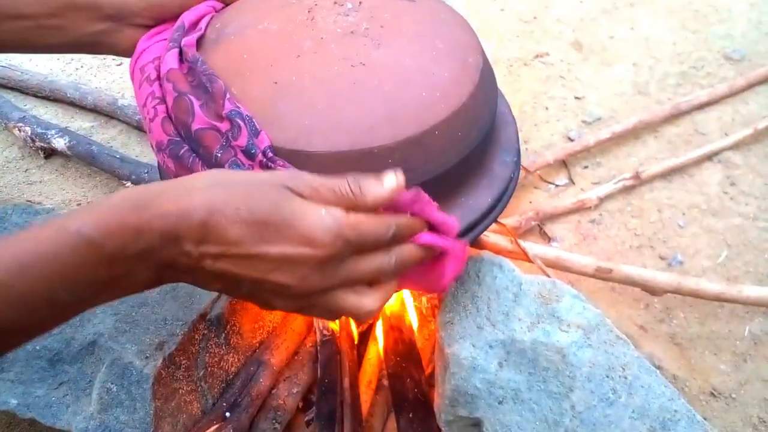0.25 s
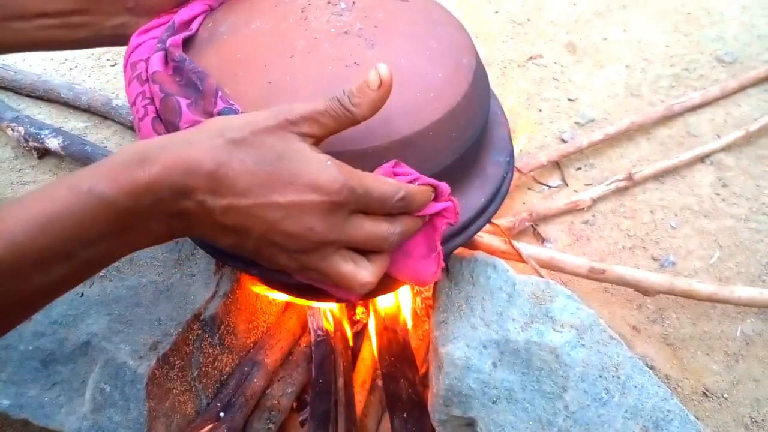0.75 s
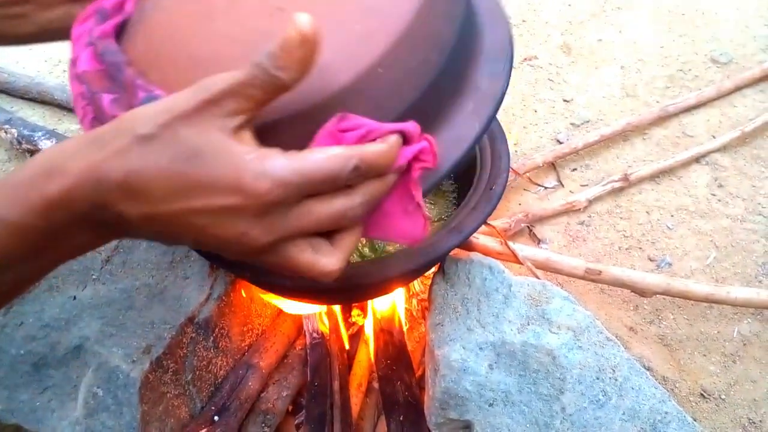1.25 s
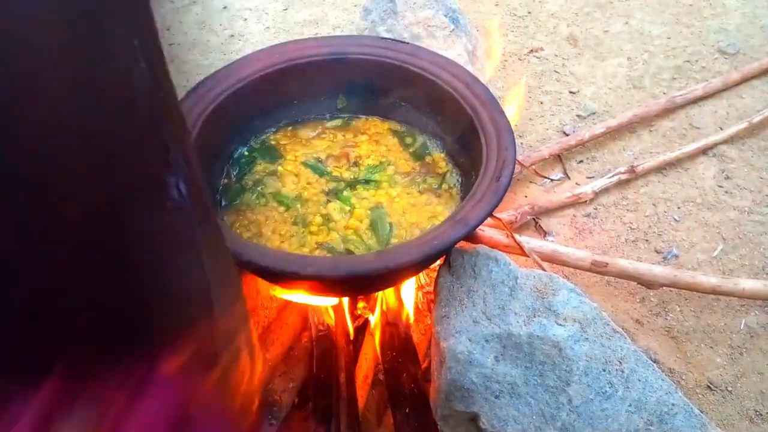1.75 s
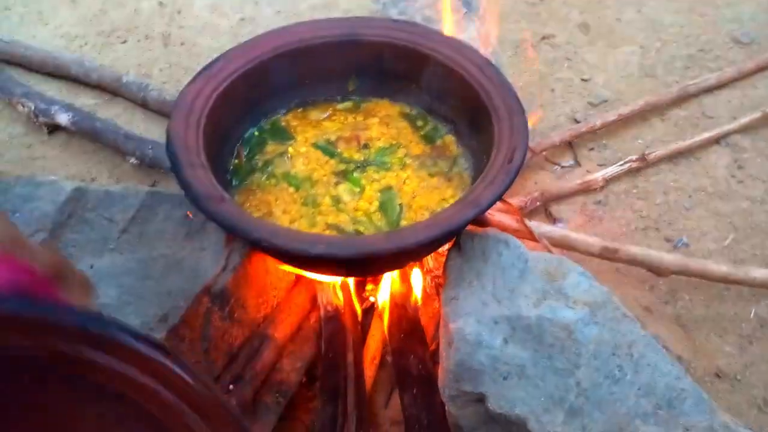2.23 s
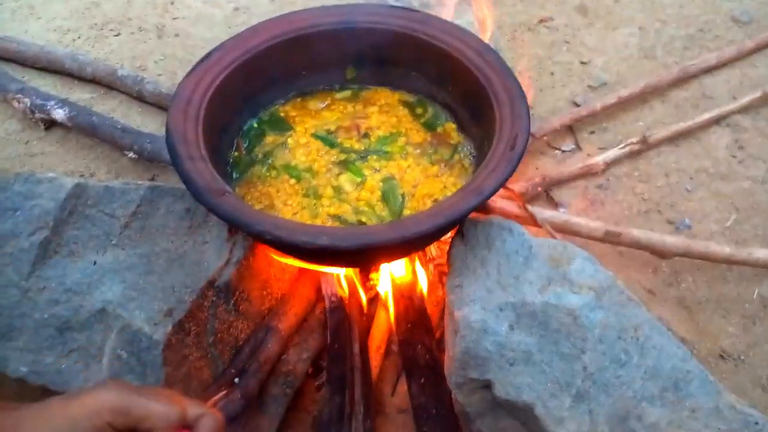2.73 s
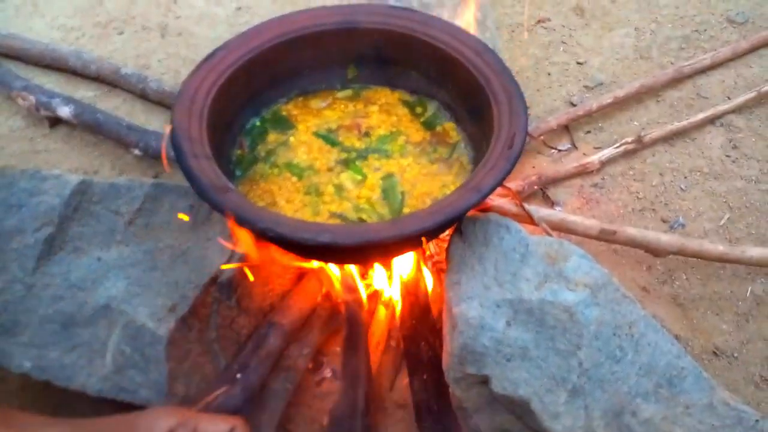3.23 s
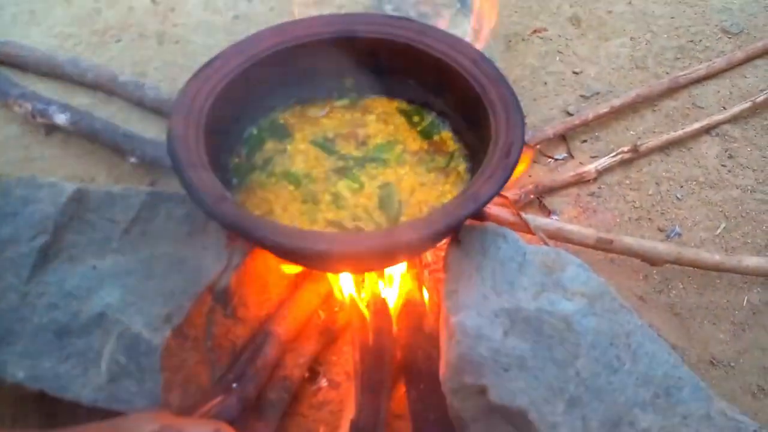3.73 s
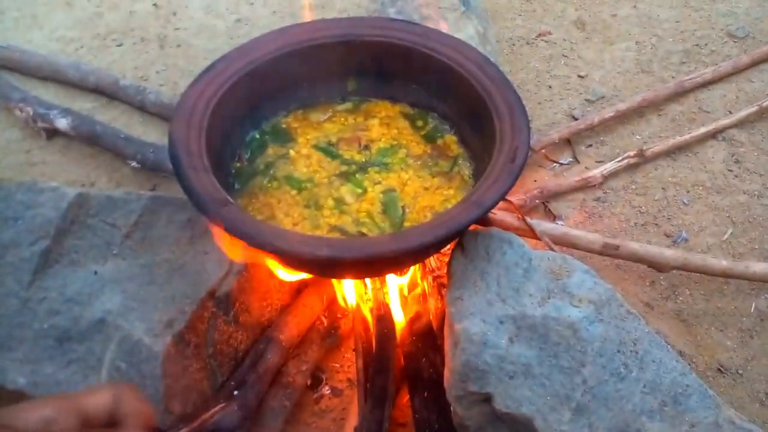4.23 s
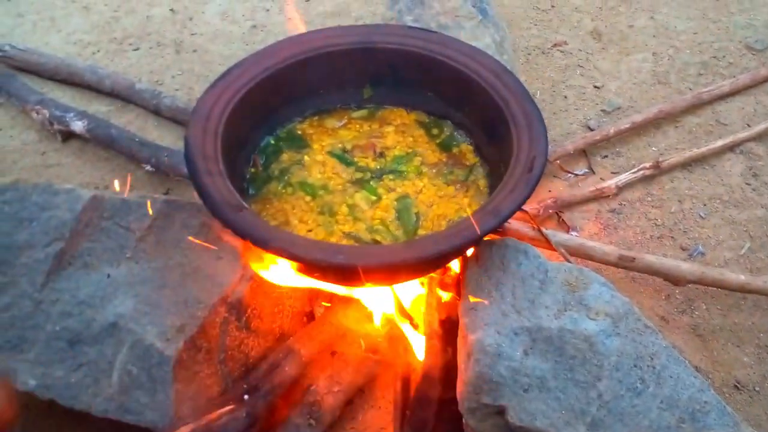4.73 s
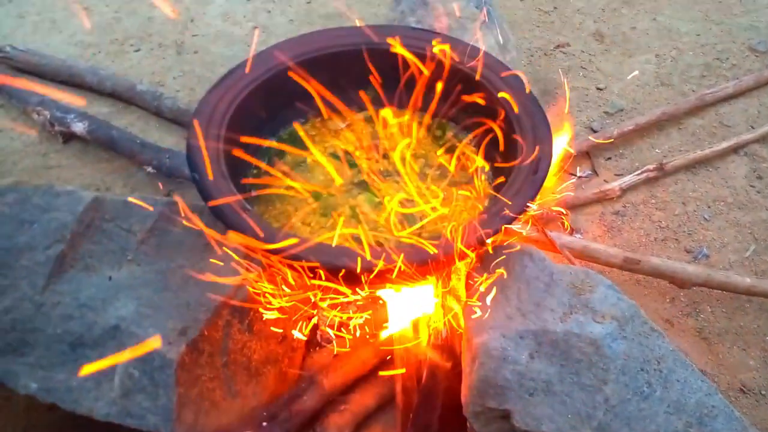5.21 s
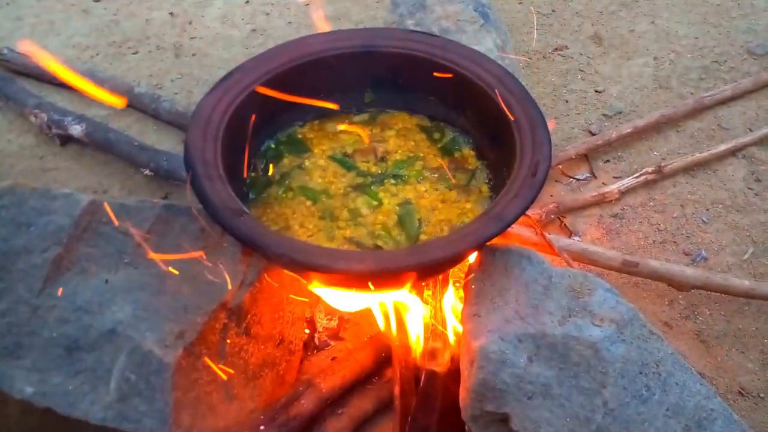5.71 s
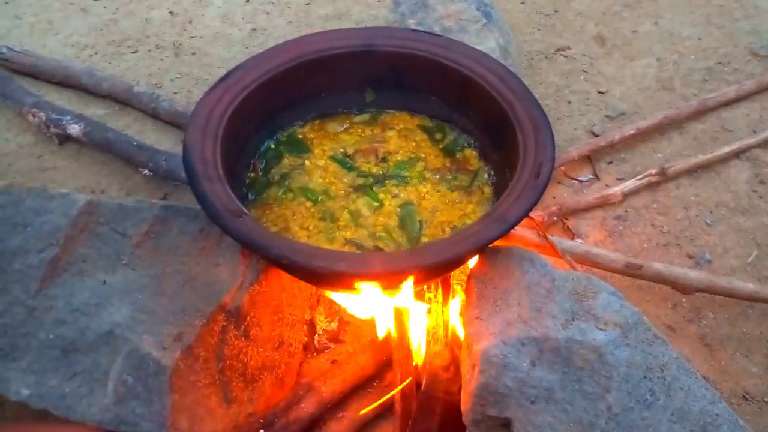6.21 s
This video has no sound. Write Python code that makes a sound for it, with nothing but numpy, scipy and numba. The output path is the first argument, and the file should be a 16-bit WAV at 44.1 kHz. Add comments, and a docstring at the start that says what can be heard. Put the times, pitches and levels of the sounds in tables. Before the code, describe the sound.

Outdoors, insects buzz steadily as a pot simmers over popping embers and a clay lid slides off, drags and knocks once sharply.

```python
"""Outdoors, close to a pot simmering on a wood fire. From the start flames rumble and embers crack; a far
chorus of insects drones, with a nearer buzz high above it. In the first second and a half the clay lid slides
off, shaking the air under it; then the open pot bubbles and spits, and one nearer singer swells. The lid is
dragged and knocked on gritty ground, which rings the clay, loudest just before 5 s. After two last light knocks
near 5.6 s, the end is left to the pot, the fire and the insects."""
import sys
import numpy as np
from scipy import signal
from scipy.fft import rfft, irfft
from scipy.io import wavfile
from numba import njit

SR = 44100
rng = np.random.default_rng(int(sys.argv[2]) if len(sys.argv) > 2 else 0)


def wav_out(sig):
    """Save sig, one row per channel (or a flat mono array), as 16-bit PCM at SR to the path in sys.argv[1]."""
    wavfile.write(sys.argv[1], SR, np.round(np.clip(np.atleast_2d(sig).T, -1, 1) * 32767).astype(np.int16))


N = 284886
TIME = np.arange(N) / SR


def from_db(db):
    return 10 ** (np.asarray(db) / 20)


def rms_one(x):
    return x / np.sqrt(np.mean(x ** 2) + 1e-20)


def in_time(rows):
    """One curve per column, joining the rows (time, values...) by straight lines."""
    times, *columns = np.transpose(rows)
    return [np.interp(TIME, times, column) for column in columns]


def ramp(start_s, length_s):
    """Climbs from 0 to 1, then holds."""
    return np.clip((TIME - start_s) / length_s, 0, 1)


def drift(rate):
    """Slow random wander of spread 1, about rate turns a second."""
    r = np.exp(-80 * np.pi * rate / SR)
    slow = signal.lfilter([1], [1, -2 * r, r * r], rng.standard_normal(N // 40 + 2002))[2000:]
    return np.interp(np.arange(N) / 40, np.arange(len(slow)), rms_one(slow))


def colour(x, spectrum):
    """Filter x by the curve (frequency [Hz], gain [dB]); rms 1."""
    hz, db = np.transpose(spectrum)
    log_hz = np.log(np.fft.rfftfreq(N, 1 / SR) + 1)
    gain = from_db(np.interp(log_hz, np.log(hz), db))
    return rms_one(irfft(rfft(x) * gain, N))


def band(x, low_hz, high_hz):
    sos = signal.butter(2, [low_hz, min(high_hz, .45 * SR)], "band", fs=SR, output="sos")
    return signal.sosfilt(sos, x)


def resonance(x, hz, width_hz):
    r = np.exp(-np.pi * width_hz / SR)
    poles = [1, -2 * r * np.cos(2 * np.pi * hz / SR), r * r]
    return signal.lfilter([(1 - r * r) / 2, 0, (r * r - 1) / 2], poles, x)


@njit
def moving_resonance(x, hz, width_hz):
    r = np.exp(-np.pi * width_hz / SR)
    y = np.zeros(len(x))
    for i in range(2, len(x)):
        y[i] = x[i] - x[i - 2] + 2 * r * np.cos(2 * np.pi * hz[i] / SR) * y[i - 1] - r * r * y[i - 2]
    return y


def ring(x, hz, t60):
    """A unit click sets a sine of height 1 ringing."""
    r, w = from_db(-60 / (t60 * SR)), 2 * np.pi * hz / SR
    return signal.lfilter([0, np.sin(w)], [1, -2 * r * np.cos(w), r * r], x + 1e-18)


def grains(per_s, spread_db):
    """Random clicks, a few much bigger than the rest."""
    sizes = from_db(spread_db * np.minimum(rng.exponential(1, N), 5)) * rng.choice([-1, 1], N)
    return sizes * (rng.random(N) < per_s / SR)


def add(out, start_s, sound, peak_db):
    """Lay a short sound into out at its peak level."""
    i = round(start_s * SR)
    out[i:i + len(sound)] += (from_db(peak_db) * sound / np.abs(sound).max())[:N - i]


# Spectrum of the open air: (frequency [Hz], gain [dB])
AIR_SPECTRUM = [(88, -60), (150, -8), (376, -1.5), (601, -7), (2100, -4.5), (3550, -28.5), (5790, -6),
                (6770, -7.5), (8070, -44), (10000, -10.5), (16000, -65)]
def open_air():
    """The steady noise of the place, behind everything else."""
    return from_db(-65) * colour(rng.standard_normal(N), AIR_SPECTRUM)


def faint_band():
    """Faint narrow noise near 3 kHz that fades as the pot comes open."""
    level_db = -79 - 58 * ramp(1.5, 1)
    narrow = resonance(resonance(rng.standard_normal(N), 2970, 55), 3000, 140)
    return from_db(level_db) * rms_one(narrow)


# Loudness of the distant insects: (time [s], level [dB])
CHORUS_LEVEL = [(0, -62), (1.5, -60.5), (3.3, -59.5), (6.46, -61)]
# Bands they sing in: (centre [Hz], width [Hz], relative level [dB])
INSECT_BANDS = [(5090, 300, -7), (5506, 230, 0), (5886, 37, 0.5), (6224, 520, 1), (6650, 17, -7),
                (6785, 330, -2)]
def far_chorus():
    """Many far singers blur into noisy bands that throb faintly."""
    level_db, = in_time(CHORUS_LEVEL)
    throb_hz, out = 64, 0
    for hz, width_hz, db in INSECT_BANDS:
        throb = 1 + 0.2 * np.sin(2 * np.pi * throb_hz * TIME + 2.7 * drift(1.1))
        noise = resonance(resonance(rng.standard_normal(N), hz, width_hz), hz, 1.84 * width_hz)
        out += from_db(db + 0.79 * drift(6.2)) * throb * noise / np.sqrt(width_hz)
    return from_db(level_db) * rms_one(out)


def near_singer():
    """A nearer insect swells, then holds: even pulses into one resonance give a comb of close lines."""
    hz, width_hz, pulses_per_s = 5654, 140, 64.5
    full_db, full_s, swell_db_per_s = -62, 3.6, 5
    cycles = np.cumsum(pulses_per_s * (1 + 0.0041 * drift(1.0))) / SR
    pulses = np.diff(np.floor(cycles), prepend=0) + 0.0026 * rng.standard_normal(N)
    song = resonance(resonance(pulses, hz, width_hz), hz, width_hz)
    # Scattering on the way to the microphone fills the gaps between pulses.
    echoes = sum(np.roll(song, round(delay_s * SR)) for delay_s in rng.uniform(0, .03, 9))
    level_db = full_db - swell_db_per_s * np.maximum(full_s - TIME, 0)
    return from_db(level_db) * rms_one(echoes)


# The two phrases of the high buzz: (start [s], end [s], swell [s])
PHRASES = [(.05, 1.86, 0.5), (2.12, 6.6, 0.3)]
def high_buzz():
    """An insect nearer than the chorus: even puffs of noise through one high resonance."""
    hz, puffs_per_s, tiring_db_per_s = 10210, 110, 1.0
    level = 0
    for start, end, swell in PHRASES:
        singing = ramp(start, swell) * (1 - ramp(end, .03))
        level += singing * from_db(-72 - tiring_db_per_s * (TIME - start))
    puffs = (.5 + .5 * np.cos(2 * np.pi * puffs_per_s * TIME)) ** 0.36
    song = resonance(rng.standard_normal(N), hz, width_hz=230) * puffs
    return level * rms_one(resonance(song, hz, width_hz=900))


# Spectrum of the flames: (frequency [Hz], gain [dB])
FLAME_SPECTRUM = [(15, -27), (25, -51), (53, 5), (75, -1), (134, 1), (195, -10.5), (352, -5), (420, -4),
                  (550, -16.5), (920, -120)]
# Hollow between the hearth stones: (resonance [Hz], width [Hz], gain over the rumble [dB])
HEARTH_MODES = [(72.4, 4.8, 7.5), (126, 8.4, -7)]
# Low thuds as the lid is knocked on the ground: (time [s], level [dB])
GROUND_THUDS = [(4.44, -63), (4.97, -46)]
def flames():
    """The fire under the pot: low lumpy noise, swelling at the hollow's resonances; the same low noise swells
    briefly in thuds as the lid is knocked on the ground."""
    steady_db, rise_s, fall_s = -65.5, 0.013, 0.044
    rumble = colour(rng.standard_normal(N), FLAME_SPECTRUM)
    hollow = sum(from_db(db) * resonance(rumble, hz, width) for hz, width, db in HEARTH_MODES)
    level = from_db(steady_db)
    for start, db in GROUND_THUDS:
        decay = np.exp(-np.maximum(TIME - start - rise_s, 0) / fall_s)
        level += from_db(db) * ramp(start, rise_s) * decay
    return level * from_db(1.5 * drift(27)) * rms_one(rumble + hollow)


# Cracks of embers and grit: (time [s], bright peak [dB], middle peak [dB], middle centre [Hz])
EMBER_AND_GRIT_CRACKS = [(0.5397, -52, -50, 4370), (0.937, -55, -50, 2930), (0.9642, -44, -44, 3860),
                         (1.0276, -49, -56, 4500), (1.6367, -49, -68, 5130), (3.464, -45, -62, 4700),
                         (3.645, -37, -38.5, 5100), (3.65, -36.5, -35.5, 5100), (3.6903, -44, -39, 4980),
                         (3.7424, -44, -43, 5040), (3.7947, -45, -40, 5130), (3.9238, -40, -49, 4060),
                         (3.9494, -43, -53, 4000), (4.147, -42.5, -43, 5300), (4.4016, -34, -31.5, 4400),
                         (4.413, -35, -48, 4460), (4.4323, -35, -43, 4440), (4.456, -51, -30, 3900),
                         (4.4783, -33, -35, 4480), (4.511, -32, -35, 4840), (4.645, -45, -39, 3850),
                         (4.724, -39, -40, 5130), (4.7755, -34.5, -34.5, 4630), (4.8728, -35, -56, 4560),
                         (4.9446, -43, -29, 4150), (4.974, -35, -45, 4980), (4.9974, -28, -33, 5070),
                         (5.0725, -33, -36, 4450), (5.1161, -33, -30, 4630), (5.1728, -29, -31, 4650),
                         (5.2275, -38, -44, 4620), (5.247, -33, -37, 4660), (5.2938, -30.5, -38, 4600),
                         (6.279, -48, -42, 6700), (6.294, -35, -34, 6650), (6.353, -46, -46.5, 4700)]
def cracks():
    """Each crack is a dying burst of noise in a bright and a middle part, with a dip between."""
    out, t = np.zeros(N), np.arange(SR // 25) / SR
    for start, bright_db, middle_db, hz in EMBER_AND_GRIT_CRACKS:
        burst = rng.standard_normal(len(t)) * np.exp(-t / .003)
        bright = band(band(burst, 10000, 17000), 9500, 19000)
        middle = band(burst, 3250, 5950) + 12 * resonance(burst, hz, 240)
        add(out, start, bright, bright_db)
        add(out, start, middle, middle_db)
    return out


# Gurgle, bubbles, seething and fizz, a row each: (level lid on [dB], level lid off [dB])
SIMMER_LEVELS = [(-68.5, -75.5), (-108, -65), (-69, -62.5), (-72.5, -65.5)]
# Vigour of the boil, added to those levels: (time [s], gain [dB])
BOIL_VIGOUR = [(0, -2.5), (1.8, -1), (2.3, 1), (4.3, -0.5), (6.46, -0.5)]
# Thin treble hiss: (time [s], level [dB])
HISS_LEVEL = [(0, -77), (.4, -77), (1.35, -69), (1.87, -70.5), (3.0, -63), (3.27, -70), (4.37, -68.5),
              (4.55, -59.5), (5.2, -57), (5.4, -72), (6.08, -76), (6.46, -69)]
def simmer():
    """In the pot, bubbles of three sizes ring some cycles; fizz and a thin treble hiss lie above."""
    hiss_db, = in_time(HISS_LEVEL)
    vigour_db, = in_time(BOIL_VIGOUR)
    opened = ramp(start_s=1, length_s=0.63)
    *bubbles_db, fizz_db = [on + (off - on) * opened + vigour_db for on, off in SIMMER_LEVELS]
    pitch_slot, out = rng.integers(0, 32, N), 0
    for level_db, (low_hz, high_hz) in zip(bubbles_db, [(300, 520), (720, 1050), (1250, 2750)]):
        births = grains(2500, spread_db=1.5)
        pitches = np.geomspace(low_hz, high_hz, 14)
        bubbles = sum(ring(births * (pitch_slot == k), hz, 20 / hz) for k, hz in enumerate(pitches))
        out += from_db(level_db) * rms_one(band(bubbles, .6 * low_hz, 1.22 * high_hz))
    spray = rng.standard_normal(N) + 1.07 * grains(290, spread_db=6.5)
    fizz = band(band(spray, 2800, 5500), 2500, 6100) * from_db(1.5 * drift(20))
    hiss = band(spray, 11950, 16200) * from_db(1.5 * drift(12))
    return out + from_db(fizz_db) * rms_one(fizz) + from_db(hiss_db) * rms_one(hiss)


# Spits from the pot: (time [s], peak [dB], pitch [Hz])
POT_SPITS = [(1.2974, -49.5, 3970), (1.4242, -49, 2490), (1.492, -45, 2460), (1.603, -43, 3500),
             (1.7598, -54, 2110), (1.8126, -41, 2670), (1.986, -47, 3400), (2.0623, -42.5, 2400),
             (2.248, -42.5, 2570), (2.2776, -39, 2540), (2.3822, -46.5, 2360), (2.5623, -43, 2160),
             (3.0644, -44, 4500), (3.0805, -43, 4310), (5.9674, -46, 2490), (6.2822, -47, 2450),
             (6.3934, -52, 2470)]
def spits():
    """A bursting bubble makes a broad tick that rings a few cycles."""
    out, t = np.zeros(N), np.arange(SR // 30) / SR
    for start, peak_db, hz in POT_SPITS:
        tick = rng.standard_normal(len(t)) * np.exp(-t / 0.0033)
        add(out, start, 0.17 * ring(tick, hz, t60=25 / hz) + 1.1 * band(tick, 250, 4600), peak_db)
    return out


# The lid chafes the rim: (start [s], length [s], pitch [Hz], level [dB])
RIM_CHAFES = [(0.335, 0.12, 2490, -66.5), (0.808, 0.14, 2410, -63), (0.983, 0.42, 1340, -68.5)]
def rim_chafes():
    """Brief rubbing on the rim: narrow noise that swells and dies."""
    noise, out = rng.standard_normal(N), 0
    for start, length, hz, db in RIM_CHAFES:
        swell = np.sin(np.pi * ramp(start, length))
        out += from_db(db) * swell * rms_one(resonance(resonance(noise, hz, 150), hz, 330))
    return out


# The lid slides off the pot: (time [s], level [dB], resonance of the air under it [Hz])
LID_SLIDE = [(0, -61, 278), (.1, -62.5, 288), (.16, -91, 292), (.42, -67.5, 270), (.7, -55, 289),
             (.876, -47.5, 358), (.972, -40.5, 428), (1.004, -60.5, 412), (1.24, -66.5, 385),
             (1.5, -70, 376)]
def lid_slide():
    """Rough clay on clay shakes the trapped air, whose pitch climbs as the gap opens."""
    level_db, hz = in_time(LID_SLIDE)
    trapped_air = moving_resonance(grains(900, spread_db=2.5), hz, width_hz=28.0)
    sliding = TIME < LID_SLIDE[-1][0]
    return from_db(level_db) * sliding * rms_one(band(trapped_air, 133, 620))


# Modes of the clay lid, dragged or knocked: (frequency [Hz], gain [dB], time to fall 60 dB [s])
LID_MODES = [(550, -19, 0.023), (897, -5, 0.06), (1110, 8.5, 0.0071), (1460, 3, 0.08), (1774, 3.5, 0.06),
             (2160, 0.5, 0.058), (2300, 0, 0.039), (2490, 6, 0.039), (2860, -19, 0.017), (3060, -7, 0.044),
             (3470, 1, 0.023), (4340, 6, 0.014), (5090, -10, 0.046)]
# Spectrum of the middle grit hiss: (frequency [Hz], gain [dB])
GRIT_SPECTRUM = [(250, -21), (400, -12), (1200, -16), (3000, -2), (4000, 2), (7000, 3.5), (8600, -21),
                 (10000, -14.5)]
# Strokes over grit: (start [s], rise [s], length [s], pitch driven hardest [Hz],
# clay gain [dB], hollow body gain [dB], grit hiss gain [dB])
DRAG_STROKES = [(0.696, 0.14, 0.23, 2200, -64.5, -80, -67), (1.688, 0.035, 0.096, 1000, -67, -63.5, -78),
                (2.046, .02, 0.056, 1500, -60.5, -62.5, -83), (0.926, .035, 0.063, 2220, -55, -74, -61),
                (2.607, .01, 0.057, 1760, -55.5, -58, -76), (2.732, 0.042, 0.15, 1850, -51, -56, -58),
                (3.013, .005, 0.16, 1940, -58.5, -93, -57.5), (3.643, 0.013, .14, 1900, -57, -75, -63),
                (4.324, 0.05, 0.091, 2040, -55, -80, -55.5), (4.4, 0.002, 0.11, 1850, -43.5, -60, -46.5),
                (4.51, 0.09, 0.3, 2000, -50.5, -73, -54), (4.842, 0.029, 0.12, 1730, -49, -75, -52.5),
                (4.951, 0.0044, 0.08, 1760, -38.5, -49.5, -47), (5.057, 0.019, 0.14, 1700, -47, -69, -51.5),
                (5.21, 0.026, 0.11, 1940, -53, -60.5, -54)]
def lid_drags():
    """In each stroke dense grit clicks ring the clay and hiss by themselves."""
    release_s, fade_db, focus_db_per_octave = 0.043, 3, 7
    starts, rises, lengths, centre_hz, clay_db, body_db, hiss_db = np.transpose(DRAG_STROKES)
    pressure = []
    for start, rise, length in zip(starts, rises, lengths):
        touching = ramp(start, rise) * (1 - ramp(start + length, release_s))
        pressure.append(touching * from_db(fade_db * (.5 - ramp(start + rise, length))))
    grit = grains(3000 * from_db(4 * drift(25)), spread_db=3.5)
    body = rms_one(band(grit, 270, 650) + 1.3 * resonance(grit, 545, 94))
    rasp = 0.34 * rms_one(band(grit, 540, 2400))
    rings = [from_db(db + 3.4 * drift(16)) * ring(grit, hz, t60) for hz, db, t60 in LID_MODES]
    clay = 0
    for (hz, _, _), ringing in zip(LID_MODES, rings):
        # Modes away from the rubbed spot's pitch are driven less.
        drive_db = clay_db - focus_db_per_octave * abs(np.log2(hz / centre_hz))
        clay += from_db(drive_db) @ pressure * ringing
    sand = grains(4000 * from_db(5.5 * drift(45)), spread_db=2)
    bright_hiss = rms_one(band(band(sand, 8100, 23000), 7300, 27400))
    hiss = colour(sand, GRIT_SPECTRUM) + from_db(-8) * bright_hiss
    return (0.9 * clay / np.std(sum(rings))
            + from_db(body_db) @ pressure * body
            + from_db(clay_db) @ pressure * rasp
            + from_db(hiss_db) @ pressure * hiss)


# Knocks on the lid: (time [s], peak [dB], pitch driven hardest [Hz], grinding length [ms])
LID_KNOCKS = [(0.9688, -46.5, 2230, 6.5), (2.616, -48, 1760, 35), (2.6429, -43.5, 1750, 9.9),
              (2.751, -46, 1470, 8.7), (2.77, -44, 1800, 52), (2.798, -38, 1800, 9.9), (2.859, -52, 560, 8),
              (3.023, -41, 2520, 6.6), (3.056, -48, 1470, 6.6), (3.483, -43.5, 2500, 5.8),
              (3.638, -38.5, 1490, 18), (3.6433, -37, 2430, 12), (3.6908, -49, 1430, 10),
              (3.7429, -39.5, 1820, 3.9), (3.795, -49, 1470, 8), (3.882, -50, 2480, 6.5),
              (4.4004, -31.5, 1420, 4.6), (4.4573, -39, 2530, 4.5), (4.4764, -36, 2300, 4.8),
              (4.762, -32, 1330, 2.2), (4.8785, -49, 1460, 14), (4.9449, -7, 1800, 7.7),
              (5.0152, -37, 1440, 17), (5.082, -38.5, 1260, 5.3), (5.12, -33, 2500, 3),
              (5.152, -33, 1460, 4), (5.1727, -25.5, 1620, 5.3), (5.2945, -36, 2060, 9.4),
              (5.5353, -38.5, 1080, 2.5), (5.632, -43.5, 1020, 12)]
def lid_knocks():
    """A soft blow and some grinding drive the modes; where it lands decides which ring loudest."""
    grind_gain, focus_db_per_octave = 0.06, 21
    out, t = np.zeros(N), np.arange(SR // 5) / SR
    for start, peak_db, centre_hz, grind_ms in LID_KNOCKS:
        blow = t == 0
        grinding = grind_gain * rng.standard_normal(len(t)) * (t < grind_ms / 1000)
        contact = signal.lfilter([1], [1, -.6], blow + grinding)   # low-pass softens the blow
        clay = 0
        for k, (hz, db, t60) in enumerate(LID_MODES):
            drive_db = db - focus_db_per_octave * abs(np.log2(hz / centre_hz))
            clay += (-1) ** k * from_db(drive_db) * ring(contact, hz, t60)
        # The lid settles in the sand, which damps the ring.
        damping = from_db(-11 * np.clip((t * 1000 - grind_ms) / 7.5, 0, 1))
        thud = 5.8 * band(contact, 275, 1500) + band(contact, 3300, 5500)
        add(out, start, damping * clay + thud, peak_db)
    return out


def scene():
    """One microphone by the fire: air and insects behind, the pot and its lid in front."""
    background = open_air() + faint_band() + far_chorus() + near_singer() + high_buzz()
    fireside = flames() + cracks() + simmer() + spits()
    lid = rim_chafes() + lid_slide() + lid_drags() + lid_knocks()
    return (background + fireside + lid)[None]


def record(dry):
    """The microphone drops the deepest bass; the top is cut."""
    bass_cut = signal.butter(3, 32, "high", fs=SR, output="sos")
    top_cut = signal.cheby2(14, 60, 16100, fs=SR, output="sos")
    return signal.sosfilt(top_cut, signal.sosfilt(bass_cut, dry))


dry = scene()
out = record(dry)
wav_out(out)
```